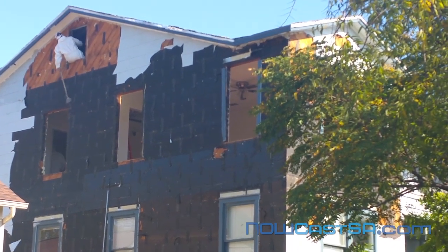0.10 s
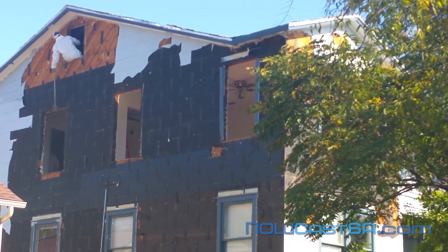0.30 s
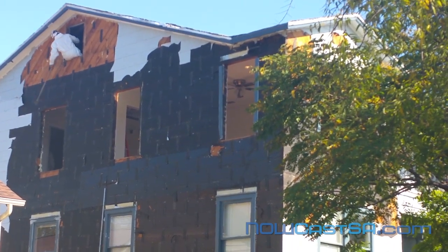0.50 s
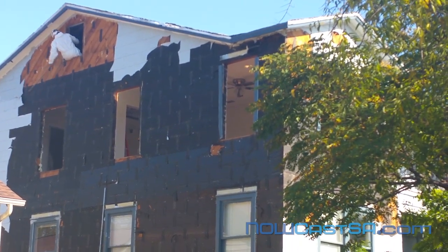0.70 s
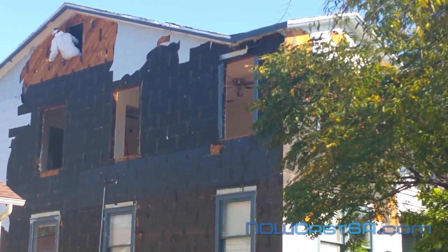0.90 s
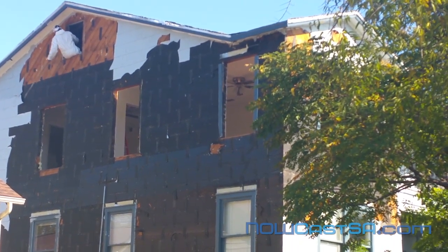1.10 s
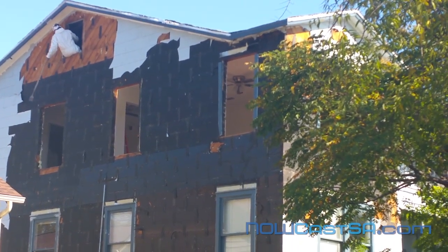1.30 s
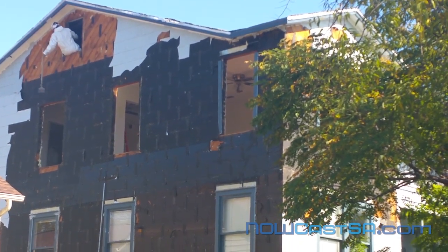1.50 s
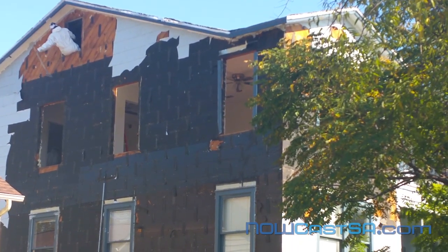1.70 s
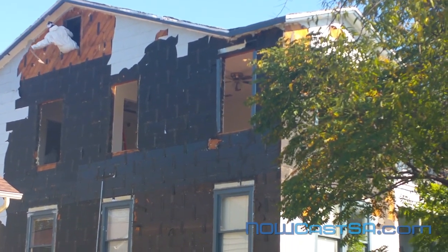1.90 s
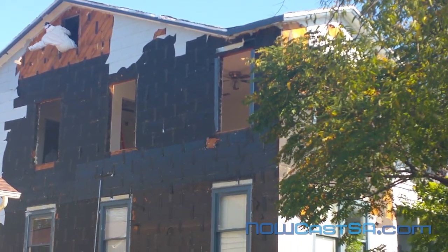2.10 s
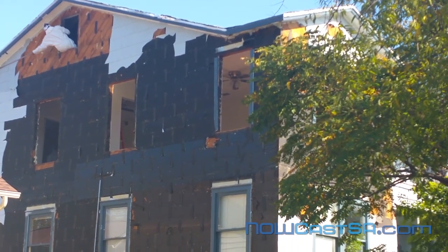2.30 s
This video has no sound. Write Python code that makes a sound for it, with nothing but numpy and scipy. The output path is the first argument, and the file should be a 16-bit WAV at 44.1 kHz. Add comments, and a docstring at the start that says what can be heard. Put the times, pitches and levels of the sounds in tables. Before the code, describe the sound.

Brittle cement shingles smash on the ground outdoors, scattering shards, then one slab lands and rings

```python
"""Beside a house, brittle cement shingles hit the ground: crashes burst into showers of shards, small chips tinkle,
and one larger slab lands and rings. Shards, chips and slab are made of short fading sine tones, with noise as dust.
The house walls answer with fading noise. A low outdoor rumble, low mids and a faint hiss of filtered noise lie under
it all, with a distant engine's steady low hum made of sines. Two microphone ports hear it, the left slightly first."""
import sys
import numpy as np
from scipy import signal
from scipy.fft import rfft, irfft, next_fast_len
from scipy.io import wavfile
from scipy.ndimage import uniform_filter1d, map_coordinates

SR = 44100
rng = np.random.default_rng(int(sys.argv[2]) if len(sys.argv) > 2 else 0)


def store_pcm(level_fs):
    """Save levels as 16-bit WAV."""
    pcm = np.round(np.clip(level_fs, -1, 1) * 32767).astype(np.int16)
    wavfile.write(sys.argv[1], SR, np.atleast_2d(pcm).T)


def level_to_linear(level):
    """Convert decibel levels to linear amplitude factors, elementwise."""
    exponent = np.asarray(level, float) / 20
    return 10 ** exponent


N = 105840  # length in samples, 2.4 s
SIDE_LEAD_S = 0.00027  # how much earlier the left port hears the chips and the outdoors


def unit(x):
    """Scale to an average (rms) strength of 1."""
    return x / np.sqrt(np.mean(x ** 2) + 1e-20)


def along(points, hz):
    """Read a curve of (pitch_hz, value) points on a log pitch axis."""
    point_hz, value = np.transpose(points)
    return np.interp(np.log(hz + 1), np.log(point_hz + 1), value)


def curves(rows):
    """Turn each column after the time into one value per sample."""
    time_s, *columns = np.transpose(rows)
    return [np.interp(np.arange(N) / SR, time_s, column) for column in columns]


def wobble(rate):
    """A smooth random curve with rate random points a second."""
    points = rng.standard_normal(int(N * rate / SR) + 4)
    return map_coordinates(points, [np.arange(N) * rate / SR])


def filtered(x, response):
    """Change the strength and timing of each frequency in x by response(hz)."""
    size = next_fast_len(N + SR // 2)
    hz = np.fft.rfftfreq(size, 1 / SR)
    return irfft(rfft(x, size) * response(hz), size)[..., :N]


def sides(pan_db):
    """Left and right gains that differ by pan_db."""
    return level_to_linear(np.array([pan_db / 2, -pan_db / 2]))


def lead(seconds, hz):
    """Let the left port hear earlier: half of the time gap goes on each port."""
    return np.exp(1j * np.pi * hz * seconds * np.array([[1], [-1]]))


def spread(pair, spectrum, alike):
    """Colour two unrelated signals and blend them to a left-right pair of rms 1."""
    def mid_and_side(hz):
        turn = np.arccos(np.clip(along(alike, hz), -1, 1)) / 2
        return level_to_linear(along(spectrum, hz)) * [np.cos(turn), np.sin(turn)]

    mid, side = filtered(pair, mid_and_side)
    return unit(np.array([mid + side, mid - side]))


def patchy(spectrum, alike, patchy_db):
    """Stereo noise of rms 1 whose strength varies in random patches of time and frequency."""
    noise = signal.stft(rng.standard_normal((2, N)), nperseg=1024)[2]
    field = uniform_filter1d(rng.standard_normal(noise.shape[1:]), size=4, axis=0)
    field = uniform_filter1d(field, size=4, axis=1)
    pair = signal.istft(noise * level_to_linear(patchy_db * unit(field)), nperseg=1024)[1][:, :N]
    return spread(pair, spectrum, alike)


def rings(s, db, hz, t60, size):
    """Add up fading sines, each with its own start; t60 is the time in seconds to fade by 60 dB."""
    attack_s = 0.00066
    t = np.arange(size) / SR
    audible = hz[:, None] < SR / 2
    fade = level_to_linear(db[:, None] - 60 * t / np.abs(t60)[:, None])
    wave = fade * np.sin(2 * np.pi * hz[:, None] * t) * audible
    wave = wave * (1 - np.exp(-t / attack_s))
    at = np.round(s * SR).astype(int)[:, None] + np.arange(size)
    return np.bincount(at.ravel(), wave.ravel(), N + SR)[:N]


def pieces(s, db, hz, t60, size, count=4):
    """Flat pieces rattle down in a few contacts and ring in several tones; db has one row per port."""
    # tones of a flat piece: pitch_ratio [multiple of its pitch], level_db [dB]
    plate_tones = [(1.002, 0), (1.429, -10.5), (1.851, -16.5), (2.55, -15)]
    rattle_s, detune = 0.007, 0.024  # longest delay of a contact; typical pitch scatter as a share
    late = rattle_s * rng.random((len(s), count)) * (np.arange(count) > 0)
    start_s = (s[:, None] + late).ravel()
    out = 0
    for ratio, level in plate_tones:
        off, uneven = np.moveaxis(rng.standard_normal((len(s), count, 2)), -1, 0)
        tone_hz = (hz[:, None] * ratio * (1 + detune * off)).ravel()
        fade_s = t60 / np.sqrt(ratio) + 0 * tone_hz  # higher tones fade sooner
        out = out + np.array([rings(start_s, (port[:, None] + level + 2 * uneven).ravel(), tone_hz, fade_s, size=size)
                              for port in db])
    return out


def crumbs(s, db, hz, count=40):
    """A brief spray of tiny fading tones scattered around a pitch; db has one row per port."""
    spray_s, scatter_octaves = 0.02, 0.462
    late = rng.random((len(s), count)) ** 1.4
    scatter = rng.standard_normal((len(s), count))
    grain_hz = (hz[:, None] * 2 ** (scatter_octaves * scatter)).ravel()
    start_s = (s[:, None] + spray_s * late).ravel()
    # later grains are weaker; each fades by 60 dB in 45 cycles
    return np.array([rings(start_s, (port[:, None] - 14 * late).ravel(), grain_hz, 45 / grain_hz, size=500)
                     for port in db])


def outdoors():
    """Uneven filtered noise makes rumble, low mids and hiss; sines with slight random drift hum like an engine."""
    # levels over time: time_s [s], level_db [dB]; the rumble's includes the recorder's gain control
    rumble_level, mids_level = [(0.0, -55), (0.04, -64), (0.17, -54), (0.21, -74), (0.3, -62), (0.36, -71),
                                (0.39, -49.5), (0.43, -59), (0.45, -47), (0.55, -74), (0.62, -60.5),
                                (0.76, -68), (0.82, -51.5), (0.92, -52.5), (1.04, -44), (1.06, -50.5),
                                (1.15, -46), (1.38, -54), (1.52, -50), (1.56, -61), (1.62, -63),
                                (1.66, -53), (1.87, -61.5), (2.4, -55)], [(0.0, -47.5), (0.25, -55.5), (0.37, -48.5), (0.49, -53),
                                                (0.69, -52.5), (1.11, -48), (1.26, -50), (1.62, -54),
                                                (1.76, -55), (2.4, -52.5)]
    air_level, hiss_level = [(0.0, -68), (0.3, -76.5), (0.4, -77), (0.49, -70), (0.55, -77), (0.68, -77),
                             (0.73, -87), (0.95, -67), (1.08, -66), (1.18, -80), (1.58, -82.5), (1.86, -83),
                             (2.11, -82), (2.4, -86)], [(0, -53), (.19, -60), (1.1, -61.5), (1.3, -56.5), (1.52, -59),
                                          (1.85, -58.5), (1.95, -53), (2.1, -55), (2.15, -55.5),
                                          (2.4, -55.5)]
    # noise colours: pitch_hz [Hz], relative_db [dB per Hz]
    rumble_colour, mids_colour = [(15, -79), (25, -33), (96, -13), (114, -11), (156, -2.5), (286, -4.5),
                                  (323, -1), (357, -7), (399, -3), (480, -7.5), (620, -40), (1060, -120)], [(300, -35), (450, -1.5), (700, 6), (1000, -1), (1500, -23.5),
                                               (2200, -32.5), (3000, -76)]
    air_colour, hiss_colour = [(9000, -44.5), (11500, -9), (13000, 1), (15500, -7)], [(650, -31), (1100, -7), (1340, -7), (1820, -8.5),
                                                 (2250, -12.5), (3350, -21.5), (4960, -23), (6120, -23.5),
                                                 (8560, -33), (12800, -27.5), (15800, -37.5)]
    # tones of a distant engine: pitch_hz [Hz], level_db [dB, before the gain control's moves]
    engine_tones = [(126, -65), (164, -62), (250, -68), (323, -62), (405, -64.5)]
    # likeness of left and right: pitch_hz [Hz], likeness [1 = same]
    far_likeness = [(60, 0.85), (250, 0.9), (700, 0.53), (2000, 0.18), (8000, 0.16)]
    # balance of the ports: pitch_hz [Hz], left_minus_right_db [dB]
    far_balance = [(60, 2.3), (180, 1.2), (550, 1.3), (1650, 7.6), (4970, 3.1), (15000, 2.5)]
    (rumble_db,), (mids_db,) = curves(rumble_level), curves(mids_level)
    (air_db,), (hiss_db,) = curves(air_level), curves(hiss_level)
    t = np.arange(N) / SR
    rumble = patchy(rumble_colour, far_likeness, patchy_db=4) * level_to_linear(rumble_db + 2.4 * wobble(12))
    hum = 0
    for hz, db in engine_tones:
        hum = hum + level_to_linear(db + 3 * wobble(12)) * np.sin(2 * np.pi * hz * t + 0.8 * wobble(8))
    hum = hum * level_to_linear(rumble_db - rumble_db.mean())  # the recorder's gain control moves rumble and hum together
    hiss = patchy(hiss_colour, far_likeness, patchy_db=2.0) * level_to_linear(hiss_db + 1.2 * wobble(7))
    mids = patchy(mids_colour, far_likeness, patchy_db=4.5) * level_to_linear(mids_db)
    air = patchy(air_colour, far_likeness, patchy_db=1.0) * level_to_linear(air_db)
    mix = mids + air + rumble + hum + hiss
    return filtered(mix, lambda hz: sides(along(far_balance, hz)))


def shower():
    """Thousands of shards, each a few cycles at its own pitch, over the noise of gritty dust."""
    # one list per stretch of falling shards: time_s [s], level_db [dB, before a common cut], bass_db [dB],
    # treble_db [dB], top_treble_db [dB, on top of treble_db], left_minus_right_db [dB]
    stretches = [
        [(0.0, -44, -1.5, -8, -9, 7.5), (0.112, -52.5, 20, -3, -3, 2), (0.186, -61.5, 2, 5, 2, -17)],
        [(0.197, -18.5, -13, -9, 5, 0), (0.203, -13.5, 0.5, 0.5, 7, -0.5), (0.25, -20, 3, 1.5, 0.5, -3)],
        [(0.253, -25.5, 1, 13.5, 14, 1), (0.261, -18, 4.5, 5.5, -2.5, 0), (0.367, -31, 3.5, 3, 0, -1.5),
         (0.375, -31, -2, 3, -0.5, -1.5)],
        [(0.378, -25, 0, 1, 0, -4), (0.384, -19.5, -9, 0.5, 4.5, -1.5), (0.435, -21, -1, 2, -1.5, -0.5)],
        [(0.438, -14, -1, -1, 1, -4), (0.468, -14, 3.5, 0.5, 6.5, -4), (0.542, -31.5, -10, 0.5, -3, -0.5),
         (0.587, -29, -21, -0.5, -11, 1.5)],
        [(0.591, -18, -14, 4, -4.5, -1), (0.597, -16, -1, 6, 5.5, -4), (0.683, -22.5, 8, 4.5, 8, -3),
         (0.7, -26, 1.5, 2.5, 9, -1.5)],
        [(0.703, -26, -13, 3.5, -1.5, -1.5), (0.871, -37, -20, 4, -12, 0), (0.893, -44.5, -9, 1.5, -9, 1),
         (0.94, -43.5, 0, 5, -12, 0)],
        [(0.943, -31, -15, -4, -3, 2), (0.949, -33.5, -25, -4, -19, 6), (1.049, -41.5, -26, -3.5, 7, -4),
         (1.071, -36.5, -20, -12, 10, -2), (1.097, -50, -9, 0.5, -3, -6), (1.187, -63, 0, -2, -2, 0),
         (1.199, -40.5, -1, 0, -12, -0.5), (1.3, -71, 4, 3, -4, -10)],
        [(1.532, -17.5, -21, -3, 1.5, 0.5), (1.558, -21, -11, 1.5, 7.5, -5), (1.582, -33.5, -17, 4, 12.5, -4.5),
         (1.63, -38.5, 3, -5, -4, 2)],
        [(1.633, -35, 11, -12, -11.5, -7.5), (1.681, -33.5, 14, -8.5, -15, -1), (1.703, -44, 14.5, -7, -10, 3),
         (1.759, -42, 0, -4, -22, 4.5), (1.825, -71, 0, 14, -2, 3), (1.85, -62, 0, 5, 12, 3)],
    ]
    # colour of the shards: pitch_hz [Hz], relative_db [dB per Hz]
    shard_colour = [(180, -57), (300, -34), (610, -10), (835, -15.5), (1050, -5.5), (1370, -2.5),
                    (1560, -1), (3020, -0.5), (3750, -6.5), (7250, -13.5), (14300, -42.5), (15500, -48)]
    # likeness of left and right: pitch_hz [Hz], likeness [1 = same]
    shard_likeness = [(300, 1), (1000, 0.73), (2000, 0.27), (4000, 0.13), (10000, 0.27)]
    shards_per_s, fade_cycles, dust_db = 3000, 18.8, 5  # cycles to fade by 60 dB; dust over shards
    clump_db, clumps_per_s = 1, 90  # shards land in clumps
    level_db, bass_db, treble_db, top_db, pan_db = curves(np.concatenate(stretches))
    count = int(shards_per_s * N / SR)
    pair = []
    for port in range(2):
        when, height = rng.random((2, count))
        hz = 400 * (15000 / 400) ** height
        shards = unit(rings(when * N / SR, 20 * np.log10(hz), hz, fade_cycles / hz, size=500))
        pair.append(shards + level_to_linear(dust_db) * rng.standard_normal(N))
    body = spread(np.array(pair), shard_colour, shard_likeness)
    low = filtered(body, lambda hz: 1 / (1 + (hz / 1100) ** 6))
    high = filtered(body, lambda hz: 1 - 1 / (1 + (hz / 3800) ** 6))
    top = filtered(body, lambda hz: 1 - 1 / (1 + (hz / 8500) ** 6))
    tilted = body + (level_to_linear(bass_db) - 1) * low
    tilted = tilted + (level_to_linear(treble_db) - 1) * (high - top) + (level_to_linear(treble_db + top_db) - 1) * top
    t = np.arange(N) / SR
    # no shards just before the first big crash at 0.197 s, nor just before the slab lands
    falling = np.zeros(N, bool)
    for rows in stretches:
        falling |= (t >= rows[0][0]) & (t <= rows[-1][0] + 0.005)
    gain = level_to_linear(level_db - 2.5 + clump_db * wobble(clumps_per_s))
    return tilted * gain * sides(pan_db) * falling


def cracks():
    """Each big piece that breaks gives a short dull plate ring with a spray of crumbs."""
    # breaks: start_s [s], level_db [dB, before a common cut], pitch_hz [Hz]
    breaks = [(0.2004, -8.5, 2177), (0.2084, -21, 2260), (0.2205, -13, 1920), (0.2587, -9.5, 2854),
              (0.2743, -14, 1555), (0.3811, -12, 2433), (0.429, -17, 2720), (0.4484, -14, 2110),
              (0.4639, -15, 2360), (0.595, -4.5, 1960), (0.6172, -2.5, 1582), (0.6348, -2.5, 1572),
              (0.6588, -13.5, 2004), (0.6753, -17.5, 1480), (0.8638, -26, 2430), (0.9483, -29, 1990),
              (1.0066, -27, 3090), (1.0565, -27, 2630), (1.0726, -26, 2582), (1.6556, -21, 1110),
              (1.6744, -21, 1065), (1.7401, -39, 2790), (1.7584, -33, 2820)]
    common_db, crumbs_db, crumbs_up = -10, -15.5, 1.2  # crumbs over the ring; their pitch as a multiple
    s, db, hz = np.transpose(breaks)
    ring_db = db + common_db
    ring = pieces(s, [ring_db], hz, t60=0.039, size=2000)
    spray = crumbs(s, [ring_db + crumbs_db], crumbs_up * hz)
    return (ring + spray)[0]


def walls(x):
    """The walls answer 300 samples later with noise in which each frequency dies at its own speed."""
    # fading of the answer: pitch_hz [Hz], t60_s [s to fade by 60 dB]
    fading = [(300, .15), (2000, 0.32), (7000, 0.15), (12000, 0.051)]
    hz, t, noise = signal.stft(rng.standard_normal((2, SR // 2)), SR, nperseg=256)
    fade = level_to_linear(-60 * t / along(fading, hz)[:, None])
    tail = signal.istft(noise * fade, SR, nperseg=256)[1]
    tail = tail / np.linalg.norm(tail[0])
    return signal.fftconvolve(np.pad(x, (300, 0))[None], tail, axes=1)[:, :N]


def chips():
    """Small bouncing pieces tinkle as little plates and shed crumbs, each from its own side."""
    # landings: start_s [s], level_db [dB], pitch_hz [Hz], left_minus_right_db [dB], crumbs_over_ring_db [dB]
    landings = [(0.276, -24, 7200, -7, 1), (0.908, -54, 10500, 6, 14), (.96, -58, 12100, 2, 5),
                (1.108, -49, 3150, 9, -22), (1.195, -39, 2100, -7, -17), (1.203, -48, 3900, -6, -2),
                (1.35, -50.5, 3300, 16.5, -9), (1.365, -44.5, 3300, 10, -14), (1.951, -50, 6950, -26, -4),
                (1.96, -41.5, 6950, -17.5, -5), (2.038, -53, 4700, 12, -10), (2.045, -52.5, 4700, 22, -8)]
    s, db, hz, pan_db, crumbs_db = np.transpose(landings)
    ports = np.array([db + pan_db / 2, db - pan_db / 2])
    return pieces(s, ports, hz, t60=0.028, size=3000) + crumbs(s, ports + crumbs_db, 1.15 * hz)


def slab():
    """One large piece lands on edge and falls flat, ringing in many tones at every contact."""
    # contacts with the ground: start_s [s], level_db [dB]
    contacts = [(1.531, -32), (1.539, -14), (1.545, -26), (1.552, -11), (1.56, -24.5)]
    # tones: pitch_hz [Hz], level_db [dB, added to the contact's], t60_s [s, free ring, limited below]
    slab_tones = [(1274, -38, 0.75), (1446, 3.5, 0.16), (1460, -28, 5.0), (2360, -16, 0.099),
                  (2554, -6.5, 0.4), (3100, -28, 0.2), (3190, -25, 0.12), (3790, -8, 0.46),
                  (4110, -20, 0.27), (4280, -20, 0.16)]
    grip_t60_s, free_db = 0.046, -15  # damped by the ground; a weak part rings on freely
    hz, level, t60 = np.transpose(slab_tones)
    out = 0
    for s, contact_db in contacts:
        start_s = s + 0 * hz
        db = contact_db + level + rng.normal(0, 1, len(hz))
        out = out + rings(start_s, db, hz, grip_t60_s + 0 * hz, size=4000)
        free_hz = hz * (1 + 0.008 * rng.standard_normal(len(hz)))
        out = out + rings(start_s, db + free_db, free_hz, np.minimum(t60, 0.3), size=14000)
    return out


def scene():
    """Breaking pieces as the two ports hear them, with the walls and the outdoors."""
    # balance of the ports: pitch_hz [Hz], left_minus_right_db [dB]
    near_balance = [(60, -9), (99, -5), (160, 2.0), (270, -7.5), (450, 10.5), (740, 3), (1220, 1.5),
                    (2010, 14), (3330, 6.5), (5500, -4), (9080, 5), (15000, 11)]
    crash_lead_s, walls_db, low_cut_hz = 0.00003, -10.5, 518

    def ports(hz):
        low_cut = (1j * hz / (low_cut_hz + 1j * hz)) ** 2  # small pieces radiate little bass
        return sides(along(near_balance, hz)) * low_cut

    outside = outdoors()
    shards = shower()
    solid = cracks() + slab()
    tinkle = chips()
    crash = shards + solid + level_to_linear(walls_db) * walls(solid + tinkle.mean(0))
    near = filtered(crash, lambda hz: lead(crash_lead_s, hz)) + filtered(tinkle, lambda hz: lead(SIDE_LEAD_S, hz))
    return filtered(near, ports) + filtered(outside, lambda hz: lead(SIDE_LEAD_S, hz))


def roll_off(x):
    """The treble ends steeply here."""
    return signal.sosfilt(signal.butter(12, 15960, fs=SR, output="sos"), x)


def record(dry):
    """Turn the finished mix into the sound that is written out."""
    return roll_off(dry)


dry = scene()
out = record(dry)
store_pcm(out)
```